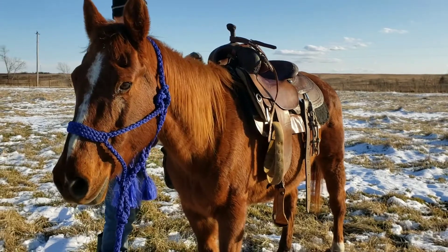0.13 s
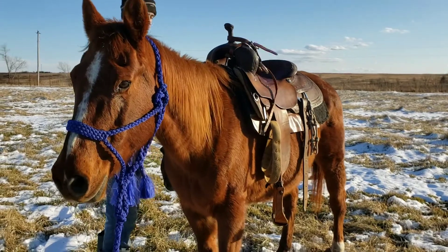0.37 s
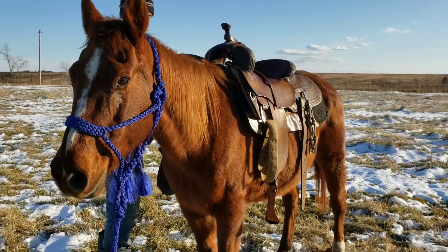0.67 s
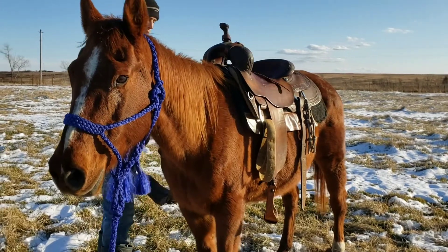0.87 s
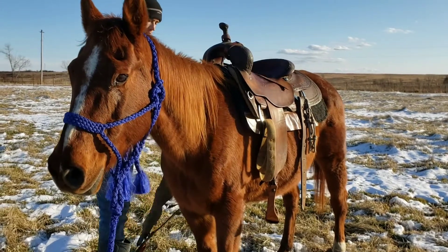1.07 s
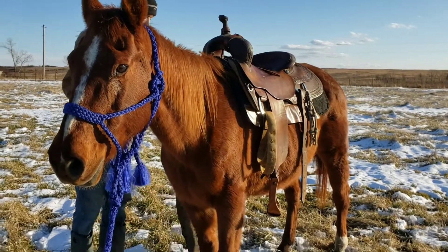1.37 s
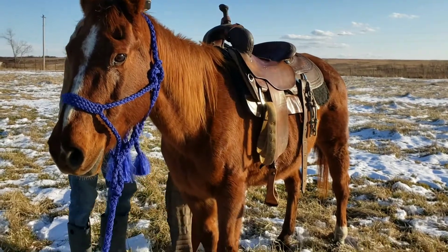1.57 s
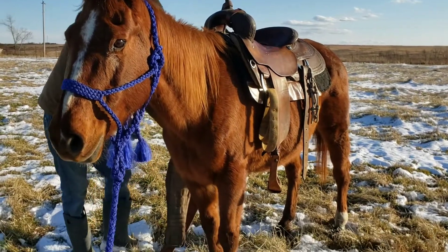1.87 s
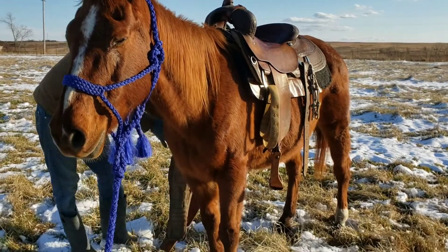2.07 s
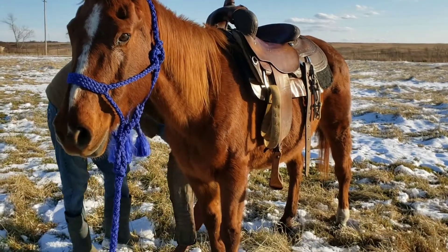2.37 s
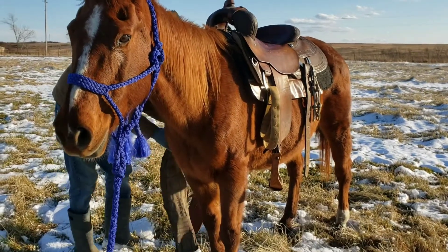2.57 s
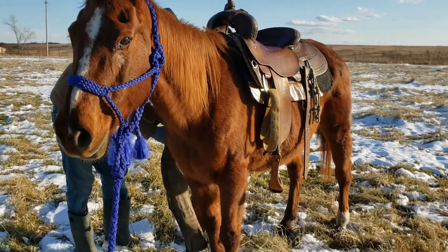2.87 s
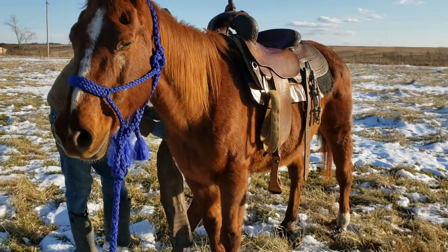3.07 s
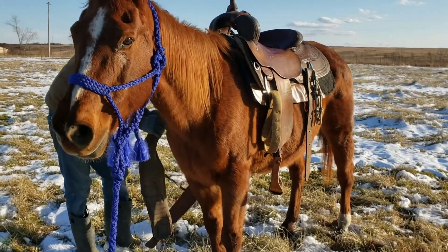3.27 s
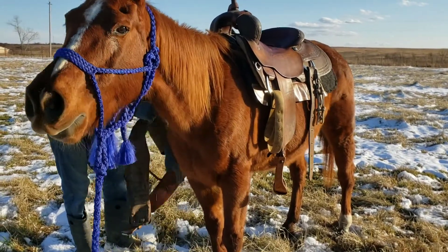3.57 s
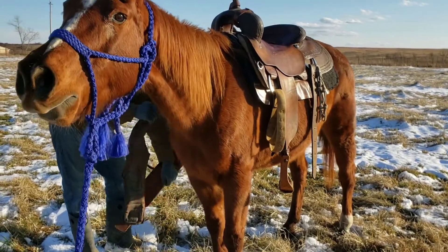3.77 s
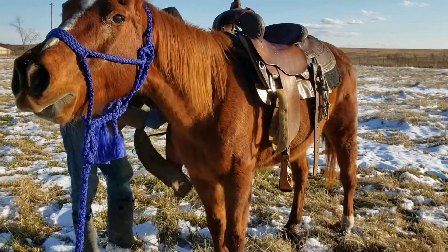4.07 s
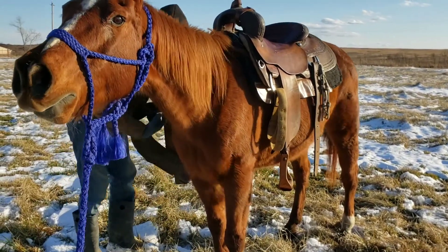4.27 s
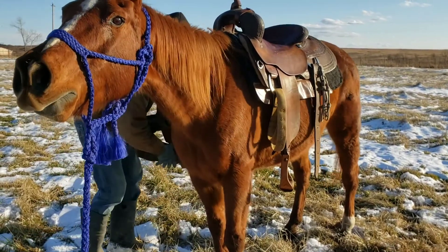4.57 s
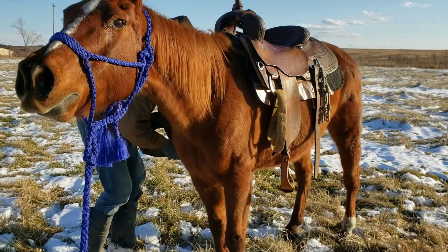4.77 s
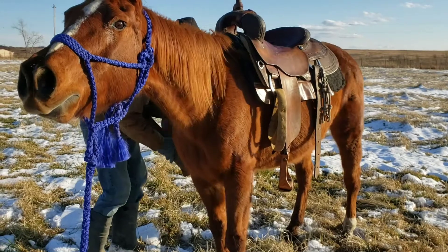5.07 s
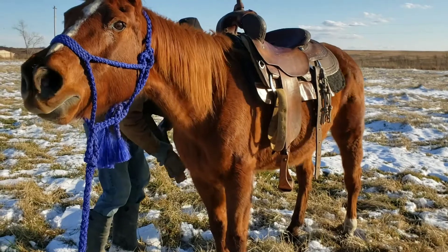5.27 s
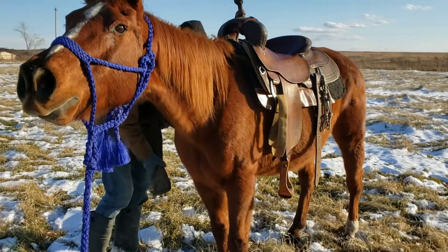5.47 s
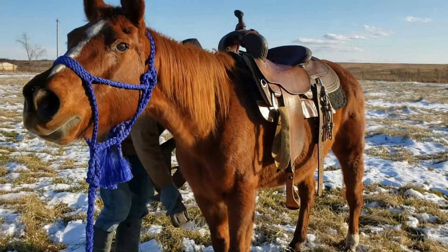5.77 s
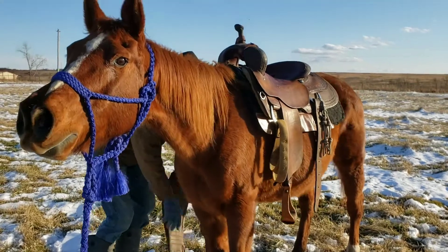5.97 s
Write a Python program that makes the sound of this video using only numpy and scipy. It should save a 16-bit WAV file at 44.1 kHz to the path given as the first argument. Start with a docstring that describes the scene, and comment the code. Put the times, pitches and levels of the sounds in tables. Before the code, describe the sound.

A saddled horse stands close to two spaced microphones in the open. The first half is very quiet: wind rumble, soft clothing scuffs, leather and metal ticks, faint descending bird notes and a barely audible husky tone. Then comes a wet smack and tiny peeps, and the horse nickers loudly, squeal after squeal tumbling into deep throaty pulses, growing lower and rougher before breaking into wet snaps, one last push and feeble throbs.

```python
"""A horse nickers close by in an open field: a run of squeals, each sliding down to a low throb.
Vocal folds are phase oscillators, the larynx whistles as a jet tone, and breath is noise shaped by airway
resonances. Peeps and wet snaps join in; tack ticks as decaying rings, a far bird slurs as gliding sines.
A faint husky tone, wind, rustling cloth and still air are shaped noise; two spaced microphones hear it all.
"""
import sys
import numpy as np
from scipy import signal
from scipy.fft import rfft, irfft, next_fast_len
from scipy.io import wavfile
from scipy.ndimage import uniform_filter1d, map_coordinates

SR = 44100
rng = np.random.default_rng(int(sys.argv[2]) if len(sys.argv) > 2 else 0)


def invert_db(level):
    """Linear amplitude ratio for a level in decibels (20 dB per decade), elementwise."""
    return 10 ** (np.asarray(level, dtype=float) / 20)


def unload_audio(sound):
    """Save the sound as a 16-bit wav file, at the path given as the first command line argument."""
    columns = np.transpose(np.atleast_2d(sound))
    # keep every value between -1 and 1, then stretch to whole-number steps
    steps = np.round(np.clip(columns, -1, 1) * 32767)
    wavfile.write(sys.argv[1], SR, steps.astype(np.int16))


N = 270320  # samples

# Vocal folds sliding in pitch: (start [s], start pitch [Hz], slide [s], landing pitch [Hz],
# share of the logarithmic slide done halfway)
FOLD_SLIDES = [(3.75, 905.3, 0.11, 425, 0.51), (3.89, 963.5, 0.095, 340.3, 0.48),
               (4.04, 1152, 0.14, 276.8, 0.6), (4.2, 1209, 0.12, 317.3, 0.56),
               (4.37, 1147, 0.14, 199.7, 0.43), (4.547, 1170, 0.12, 182.5, 0.46),
               (4.742, 926.3, 0.083, 177.9, 0.4), (4.926, 700, 0.085, 170.8, 0.38),
               (5.111, 582, 0.12, 113.5, 0.53), (5.401, 221.5, 0.0405, 165.3, 0.22),
               (5.47, 149.9, 0.12, 155.6, .5), (5.633, 676.4, 0.062, 183.5, .45),
               (5.932, 230, 0.025, 172.4, 0.49), (6.0, 159.5, 0.13, 144, 0.51)]
SAG_PER_S, RESET_S = 1.9, 0.0072  # log pitch lost a second after landing; time to tighten again [s]
# Low throbs of the slack folds: (time [s], relative peak level [dB], decay width [s])
FOLD_THROBS = [(3.995, -32.5, 0.0063), (4.154, -30.5, 0.0067), (4.331, -27, 0.011), (4.47, -34, 0.014),
               (4.503, -19.5, 0.012), (4.666, -16, 0.0099), (4.704, -20.5, 0.011), (4.83, -16.5, 0.014),
               (4.876, -19, 0.013), (5.003, -17.5, 0.013), (5.058, -20.5, 0.015), (5.18, -20, 0.015),
               (5.217, -21.5, 0.0028), (5.423, -37, 0.015), (5.495, -34, 0.004), (5.512, -20, .008),
               (5.535, -35, 0.0073), (5.569, -31, 0.008), (5.595, -20.5, 0.01), (5.689, -20, 0.013),
               (5.714, -18.5, 0.008), (5.958, -35.5, 0.0087), (6.036, -25.5, 0.0078), (6.096, -30, 0.01),
               (6.125, -22.5, 0.0037)]
SLOW_RISE = 1.4  # rise width over decay width
# Tight folds catching as a high slide starts:
# (attack [dB/s], first relative level [dB], hold [s], last relative level [dB], release [dB/s])
SQUEAK_RULE = (3000, -54, 0, -57.5, 605)
SQUEAL_DB, FLUTTER_DB = -1.5, 3  # tight folds against throat effort; scale of their unsteady level
RIPPLE_DB, HOARSE = 1.8, .15  # scales of the folds' random level and phase [rad]
BEAT = .35  # every third cycle closes harder by this share

# Whistle of the larynx: (start [s], length [s], edge pitch [Hz], top pitch before droop [Hz],
# relative late level [dB])
LARYNX_WHISTLES = [(3.75, .088, 1660, 1850, -25), (3.895, .088, 1680, 1920, -26),
                   (4.065, .078, 1660, 1900, -23), (4.228, .075, 1680, 1880, -24),
                   (4.398, .078, 1700, 1860, -23), (4.575, .058, 1710, 1830, -21),
                   (4.76, .045, 1610, 1640, -27), (4.96, .03, 1670, 1710, -27),
                   (5.135, .03, 1690, 1710, -29)]
GROWTH_DB, DROOP_HZ = 4, 90  # level gained along a whistle; fall in pitch at its very end

# Pushes of breath: (full flow from [s], hold [s], first relative level [dB], last relative level [dB])
BREATH_PUSHES = [(3.789, 0.022, -26.5, -22.5), (3.934, 0.037, -22.5, -21.5), (4.098, 0.044, -23.5, -22),
                 (4.263, 0.038, -23, -22), (4.421, 0.048, -25, -23), (4.596, 0.035, -23.5, -22),
                 (4.777, 0.038, -23.5, -24.5), (4.957, 0.028, -23.5, -24), (5.14, 0.018, -24.5, -23.5),
                 (5.654, 0.024, -24, -23.5)]
# How each breath layer follows a push: (attack [dB/s], first offset [dB], last offset [dB],
# linger [s], change over the linger [dB], release [dB/s]); breath() sets a floor to the linger
THROAT_RULE = (300, -8.5, -7, .018, -2, 750)
RASP_RULE = (440, -3, -0.5, -0.0086, -5.5, 695)
NOSTRIL_RULE = (414, -8, -7, -0.2383, 0.5, 595)
# Short puffs past lips and palate:
# (time [s], relative rasp level [dB], throat over rasp [dB], hiss over rasp [dB])
LIP_PUFFS = [(3.378, -58, 16, 2), (3.425, -45.5, 8, -3), (3.406, -55, 22.5, -4), (3.444, -50.5, 26, 14.5),
             (3.484, -54, 22, 13), (3.539, -40, -17, -4), (4.048, -39, -11, -12), (4.208, -46, -5, -12),
             (4.354, -41, 4.5, 6), (4.556, -43, -8, -23), (4.868, -37.5, 5, 1), (5.037, -28, -4, -10),
             (5.216, -34, -3, -2), (5.419, -38, 1.5, 2), (5.491, -45, -16, 18), (5.545, -24, -33, -22),
             (5.569, -44, -12, 14), (5.945, -41, 4, 0.5), (6.069, -38, -24, 2), (6.124, -30.5, -7, -4)]
PUFF_RISE, PUFF_FALL = 1250, 1020  # dB/s
# Air leaking between pushes: (time [s], relative rasp level [dB])
BREATH_LEAK = [(3.2, -91), (3.34, -59), (3.39, -45), (3.435, -40.5), (3.46, -49.5), (3.52, -53),
               (3.61, -47.5), (3.64, -43.5), (3.665, -41.5), (3.745, -41), (3.87, -38.5), (4.0, -50.5),
               (4.55, -44), (4.72, -46), (5.201, -43.5), (5.245, -97), (5.278, -58.5), (5.334, -43),
               (5.4, -44.5), (5.47, -63), (5.495, -41), (5.529, -35.5), (5.619, -41.5), (5.718, -41),
               (5.758, -62), (5.929, -43), (5.959, -52), (5.986, -79), (6.021, -42.5), (6.12, -44)]
LEAK_THROAT_DB, LEAK_HISS_DB = -4, -1.5  # over the rasp
# Corners of the span in which the throat is shut: (closing [s], shut [s], opening [s], open [s])
THROAT_SHUT = (3.55, 3.57, 3.635, 3.65)
SHUT_DB = -17  # throat layer while shut
# Airway resonances: (centre [Hz], width [Hz], relative level [dB])
AIRWAY_MODES = [(180, 90, -7), (600, 110, -6), (1150, 260, -3), (1700, 190, -1.5), (2120, 100, 1),
                (2400, 150, 1), (3050, 150, -14), (3620, 130, -9)]
# Notches cut by side pockets of the airway: (centre [Hz], width [Hz])
SIDE_POCKETS = [(1410, 150), (1965, 110), (2770, 520)]
# Spectrum of the nostril hiss: (frequency [Hz], relative density [dB per Hz])
HISS_SPECTRUM = [(1760, -97), (3000, 4), (3240, -5.5), (3600, 7.5), (4000, 6), (4300, 5.5), (4830, -5),
                 (5700, 6.5), (6150, 4.5), (7050, 0.5), (7700, -10), (8500, -48), (9500, -11), (12500, -2),
                 (16000, -1.5)]
VOICING = 1.7  # overtones of the folds against breath noise in the throat
CLAP, BURST_DB = 1.3, 1.6  # claps of the folds against noise in the rasp; scale of the rasp's bursts

# Thin peeps before the run, one table a peep: (time [s], pitch [Hz], relative level [dB])
FOLD_PEEPS = [
    [(3.533, 1054, -48), (3.556, 1155, -41)],
    [(3.562, 1530, -36), (3.578, 1610, -36), (3.588, 1790, -39), (3.6, 1540, -37)],
    [(3.665, 1167, -36), (3.69, 1015, -36), (3.72, 1070, -40.5), (3.75, 1192, -35)],
]
# Octave over each peep's fundamental, in order: (level [dB])
PEEP_OCTAVES = [-1, -34, -4.5]
# Wet snaps of lips and palate: (time [s], relative level [dB], low push over that level [dB])
WET_SNAPS = [(3.405, -47, -8), (3.425, -42, 0), (3.444, -27, 10), (3.484, -45, -11), (5.414, -20, -9),
             (5.486, -29, 0), (5.542, -21.5, 5.5), (5.563, -17, 5), (5.578, -9.5, -12), (5.941, -27.5, 3),
             (6.066, -21.5, 6)]

# Left microphone over right, for the horse: (frequency [Hz], level difference [dB])
LEFT_OVER_RIGHT = [(60, 2), (380, .5), (1000, 3), (1700, 5), (2100, -3.5), (4400, .4), (8100, 1),
                   (15000, 5)]
# Lead of the left microphone, as long waves bend round and arrive nearly together:
# (frequency [Hz], lead [ms])
LEFT_LEAD = [(100, .02), (500, .19), (1400, .357), (4100, .366), (6000, .413), (11000, .405)]

# Buckles and leather:
# (time [s], relative level [dB], relative thud level [dB], 60 dB decay time [s], ring [Hz])
TACK_TICKS = [(0.5682, -53.5, 2.5, 0.013, 6500), (0.581, -46, -5.5, 0.029, 5630),
              (0.648, -62, -2.5, 0.024, 5800), (0.9045, -48.5, -45, 0.48, 14300),
              (1.346, -17, -39.5, 0.012, 16200), (2.707, -54.5, -10, 0.04, 6600),
              (2.806, -46.5, -43, 0.11, 5700), (2.931, -43.5, -44, 0.031, 6700),
              (3.031, -47, -40, 0.034, 6800), (3.0869, -35.5, -22.5, 0.1, 6300),
              (3.176, -34.5, -38, 0.058, 15000), (3.2072, -42.5, -36, 0.17, 4580),
              (3.2278, -31, -31.5, 0.035, 6640)]
# Far bird, one table a note: (time [s], pitch [Hz], relative level [dB])
BIRD_NOTES = [
    [(.9, 2810, -74), (.97, 2770, -72), (1.0, 2860, -78)],
    [(.9, 5850, -76), (.925, 5800, -76)],
    [(1.22, 4760, -69), (1.35, 4400, -62), (1.42, 4130, -74), (1.54, 3700, -76)],
    [(1.395, 5550, -72), (1.415, 5500, -72)],
    [(1.675, 4980, -75), (1.71, 4880, -74)],
    [(1.81, 4640, -81), (1.84, 4570, -76)],
    [(1.92, 3620, -76), (2.05, 2950, -64), (2.12, 2870, -73), (2.25, 2890, -82)],
    [(2.04, 1750, -86), (2.2, 2150, -78), (2.3, 2450, -80)],
    [(3.195, 4390, -62), (3.225, 4360, -62)],
]

# Faint husky tone: (time [s], level [dB]), then its spectrum (frequency [Hz], relative density [dB per Hz])
DRONE_SWELL = [(1.6, -100), (1.75, -71.5), (2.6, -69), (2.75, -100)]
DRONE_SPECTRUM = [(900, -30), (1220, 0), (1500, -30)]

# Movement of cloth and straps: (time [s], rustle level [dB])
CLOTH_MOVES = [(0, -82.5), (.6, -61.5), (.88, -67.5), (.97, -63), (1.22, -52), (1.33, -54.5), (1.4, -58),
               (2.25, -65), (2.8, -63), (3.3, -64)]
# Scuffs of cloth and straps: (time [s], level [dB])
CLOTH_SCUFFS = [(1.02, -52), (1.078, -49.5), (1.19, -47), (1.28, -46.5), (1.335, -50), (1.66, -57),
                (1.901, -54), (2.18, -59.5)]
# Low buffets of wind: (start [s], hold [s], relative level [dB])
WIND_BUFFETS = [(0.563, 0.0091, -58.5), (1.108, 0.09, -69), (2.426, 0.045, -48.5), (2.597, 0.25, -54),
                (3.27, 4.7, -65)]
# Blasts of air at the microphones: (start [s], hold [s], relative level [dB])
AIR_BLASTS = [(3.45, 0.0034, -38.5), (3.912, 0.0098, -36), (4.67, 0.19, -50), (4.99, 0.21, -47.5),
              (5.527, 0.0092, -41), (6.094, 0.041, -49)]
SCUFF_SLOPE, BUFFET_SLOPE, BLAST_RISE, BLAST_FALL = 210, 80, 310, 195  # dB/s
# Level of the still air: (time [s], level [dB])
STILL_AIR_LEVEL = [(0, -69), (.75, -69.5), (1.2, -75), (3.3, -62)]
# Spectra of wind hum, buffets, blasts, rustle and still air:
# (frequency [Hz], relative density [dB per Hz])
HUM_SPECTRUM = [(15, -48), (25, -19), (39, -16.5), (81, 0), (113, -11.5), (204, -22.5), (400, -30.5),
                (520, -52), (880, -120)]
BUFFET_SPECTRUM = [(47, -8.5), (80, 1), (204, -2), (400, -29), (520, -67), (880, -120)]
BLAST_SPECTRUM = [(12, -55), (28, -10), (50, 9.5), (100, -16.0), (200, -27.0)]
RUSTLE_SPECTRUM = [(180, 4.5), (300, 0), (645, -8.5), (787, -1), (1580, -7.5), (4590, -6), (5250, -6),
                   (6620, 2.5), (8090, -20), (14700, 2.5), (16000, -5.5)]
STILL_AIR_SPECTRUM = [(120, -54), (200, -61), (432, -7.5), (600, -5), (722, -7), (1650, -8), (2250, -3),
                      (2600, 1), (2900, -4.5), (4120, -12.5), (4350, -13), (6640, -8.5), (9230, -64),
                      (16000, -35)]


def along(points, hz):
    """Interpolation of (frequency [Hz], value) points on a logarithmic frequency axis."""
    f, v = np.transpose(points)
    return np.interp(np.log(hz + 1), np.log(f + 1), v)


def curves(rows):
    """Linear interpolation in time: one value per sample for each column after the time."""
    s, *cols = np.transpose(rows)
    return [np.interp(np.arange(N) / SR, s, c) for c in cols]


def unit(x):
    """Normalization to a root-mean-square value of 1."""
    return x / np.sqrt(np.mean(x ** 2) + 1e-20)


def wobble(rate):
    """Band-limited random modulation: a smooth curve through rate random knots a second."""
    knots = rng.standard_normal(int(N * rate / SR) + 4)
    return map_coordinates(knots, [np.arange(N) * rate / SR])


def filtered(x, response):
    """Linear filtering: the spectrum times a complex response of frequency."""
    m = next_fast_len(N + 8192)
    return irfft(rfft(x, m) * response(np.fft.rfftfreq(m, 1 / SR)), m)[..., :N]


def diffuse(spectrum, mono_hz):
    """Diffuse-field coherence: stereo noise of rms 1, alike on both sides well below mono_hz."""
    def mid_side(hz):
        turn = np.arccos(1 / (1 + (hz / mono_hz) ** 2)) / 2
        return invert_db(along(spectrum, hz)) * [np.cos(turn), np.sin(turn)]

    mid, side = filtered(rng.standard_normal((2, N)), mid_side)
    return unit(np.array([mid + side, mid - side]))


def ramped(corners, rise, fall):
    """Exponential onset and decay: corners led in and out by slopes in dB/s."""
    (s0, db0), (s1, db1) = corners[0], corners[-1]
    return [(s0 - 100 / rise, db0 - 100)] + corners + [(s1 + 100 / fall, db1 - 100)]


def swells(shapes):
    """Power addition: gain of overlapping swells, each given by corners (time [s], level [dB])."""
    t = np.arange(0, N / SR + .002, .001)
    power = sum(invert_db(2 * np.interp(t, *np.transpose(corners))) for corners in shapes)
    return np.interp(np.arange(N) / SR, t, np.sqrt(power))


def horse():
    """Superposition and interaural cues: folds, whistle and breath reach the left microphone first."""
    effort, throat_gain = breath(THROAT_RULE, LEAK_THROAT_DB, order=1)
    rasp_gain = breath(RASP_RULE, 0, order=0)[1]
    hiss_gain = breath(NOSTRIL_RULE, LEAK_HISS_DB, order=2)[1]
    phase, size = folds(effort)
    shake = invert_db(0.95 * wobble(98))
    gate = (1 + 0.027 * np.cos(phase)) * shake  # the folds chop the air once a cycle
    air = rng.standard_normal((4, N))
    throat = throat_breath(gate * air[:2], phase, size, effort, shake) * throat_gain
    throat = throat * invert_db(np.interp(np.arange(N) / SR, THROAT_SHUT, (0, SHUT_DB, SHUT_DB, 0)))
    rasp = raspy_breath(gate * air[1:3], air[3], phase, effort) * rasp_gain
    hiss = nostril_hiss(gate * air[2:]) * hiss_gain

    voice = size * np.sin(phase) + invert_db(2) * filtered(whistle(phase, size), side_pockets)
    direct = voice + throat[0] + rasp[0] + hiss[0] + snaps() + peeps()
    side = np.array([[.5], [-.5]])  # left, right

    def to_microphones(f):
        lead_s = along(LEFT_LEAD, f) / 1000
        return invert_db(side * along(LEFT_OVER_RIGHT, f)) * np.exp(2j * np.pi * f * side * lead_s)

    # bounces off head and ground differ side to side
    bounces = .75 * hiss[1] + .3 * rasp[1] + .45 * throat[1]
    return filtered(direct, to_microphones) + 2 * side * bounces


def folds(effort):
    """Self-sustained oscillation: phase and envelope of folds that squeal, slide, land, sag and throb."""
    t = np.arange(N) / SR
    ends = [row[0] - RESET_S for row in FOLD_SLIDES[1:]] + [N / SR]
    corners = []  # (time [s], natural log of pitch in Hz)
    for (s, hz, slide, low, half), end in zip(FOLD_SLIDES, ends):
        landing = s + slide
        corners += [(s, np.log(hz)),
                    (s + slide / 2, np.log(hz) + half * np.log(low / hz)),
                    (landing, np.log(low)),
                    (max(end, landing + .001), np.log(low) - SAG_PER_S * max(end - s - slide, 0))]
    jitter = 1 + 0.02 * wobble(60) + 0.025 * wobble(250)
    phase = 2 * np.pi * np.cumsum(np.exp(curves(corners)[0]) * jitter) / SR

    attack, first_db, hold, last_db, release = SQUEAK_RULE
    squeaks = swells([ramped([(s, first_db), (s + hold, last_db)], attack, release)
                      for s, hz, *rest in FOLD_SLIDES if hz > 500])
    power = (np.hypot(effort, squeaks) * invert_db(SQUEAL_DB + FLUTTER_DB * wobble(65))) ** 2
    for s, db, width in FOLD_THROBS:
        near = slice(round((s - .08) * SR), round((s + .08) * SR))
        spread = width * np.where(t[near] < s, SLOW_RISE, 1)
        power[near] += invert_db(2 * db) * np.exp(-((t[near] - s) / spread) ** 2)
    beat = 1 + BEAT * np.cos(phase / 3 + wobble(25))
    return phase + HOARSE * wobble(110), np.sqrt(power) * beat * invert_db(RIPPLE_DB * wobble(70))


def whistle(phase, size):
    """Jet tone and intermodulation: an arched tone, its octave and a rough side tone at jet plus fold pitch."""
    out, waver, rough = np.zeros(N), .5 * wobble(130), .6 * wobble(220)
    voiced = size / (size + invert_db(-31.5))
    for s, length, edge_hz, top_hz, late_db in LARYNX_WHISTLES:
        early_db = late_db - GROWTH_DB
        u = np.arange(round(length * SR)) / (length * SR)  # 0 to 1 along the whistle
        a = round(s * SR)
        here = slice(a, a + len(u))
        arch = np.sin(np.pi * u)
        hz = edge_hz + (top_hz - edge_hz) * arch ** 0.73 - DROOP_HZ * u ** 4
        turn = 2 * np.pi * np.cumsum(hz) / SR + waver[here]
        octave = invert_db(early_db / 2 + 10.5) * arch * np.sin(2 * (turn + rough[here]))
        side_gain = invert_db(12.0) * voiced[here] * np.clip(1.8 * u, 0, 1) * (1 - u ** 4)
        side_tone = side_gain * np.sin(turn + (phase + rough)[here])
        level = invert_db(early_db + (late_db - early_db) * u + 1.5) * arch ** .5
        out[here] += level * (np.sin(turn) + octave + side_tone)
    return out * invert_db(1.5 * wobble(90))


def breath(rule, leak_db, order):
    """Flow-driven turbulence: gain of one layer for the pushes alone, and with puffs and leak added."""
    attack, first_db, last_db, linger, loss_db, release = rule
    pushes = []
    for s, hold, a, b in BREATH_PUSHES:
        corners = [(s, a + first_db),
                   (s + max(hold, .004), b + last_db),
                   (s + hold + max(linger, .012), b + last_db + loss_db)]
        pushes.append(ramped(corners, attack, release))
    puffs = [ramped([(s, db + (0, *colour)[order])], PUFF_RISE, PUFF_FALL) for s, db, *colour in LIP_PUFFS]
    leak = [(s, db + leak_db) for s, db in BREATH_LEAK]
    return swells(pushes), swells(pushes + puffs + [leak])


def throat_breath(noise, phase, size, effort, shake):
    """Source-filter principle: breath noise and fold overtones excite the three lowest airway modes."""
    slack = .13 * wobble(130)  # uneven closing blurs the higher overtones most
    overtones = shake * sum(np.sin(k * (phase + slack)) * invert_db(-1.5 * k) for k in range(2, 12))
    voicing = unit(overtones) * np.clip(effort / invert_db(-24), .15, 1) * size / (size + invert_db(-28))
    source = noise + [[VOICING], [0]] * voicing
    return unit(filtered(source, lambda f: airway(f, AIRWAY_MODES[:3]) * side_pockets(f)))


def raspy_breath(noise, unevenness, phase, effort):
    """Pulse excitation: sharp, uneven claps of the folds and noise drive the higher airway modes."""
    closing = unit(np.exp(9 * np.cos(phase)) * invert_db(2 * unevenness))
    source = noise + [[CLAP], [0]] * (closing * np.clip(effort / invert_db(-36), 0, 1))
    rasp = unit(filtered(source, lambda f: airway(f, AIRWAY_MODES[3:]) * side_pockets(f)))
    return rasp * invert_db(-2.0 + BURST_DB * wobble(120))


def nostril_hiss(noise):
    """Turbulence noise: broadband hiss shaped by its spectrum and the notches of the side pockets."""
    hiss = unit(filtered(noise, lambda f: invert_db(along(HISS_SPECTRUM, f)) * side_pockets(f)))
    return hiss * invert_db(1.86 * wobble(70))


def airway(f, modes=AIRWAY_MODES):
    """Modal superposition: resonances of the throat and nose, summed with alternating sign."""
    return sum((-1) ** k * invert_db(db) * 1j * f * w / (c * c - f * f + 1j * f * w)
               for k, (c, w, db) in enumerate(modes))


def side_pockets(f):
    """Side-branch absorption: each pocket of the airway cuts a notch at its own resonance."""
    return np.prod([1 - .97j * f * w / (c * c - f * f + 1j * f * w) for c, w in SIDE_POCKETS], axis=0)


def peeps():
    """Oscillation near threshold: the tight folds barely sound in thin wavering tones with an octave."""
    out = np.zeros(N)
    for note, octave_db in zip(FOLD_PEEPS, PEEP_OCTAVES):
        start = (note[0][0] - .008, note[0][1], -90)
        end = (note[-1][0] + 0.019, note[-1][1], -90)
        hz, db = curves([start] + note + [end])
        on = db > -89
        turn = 2 * np.pi * np.cumsum(hz * on) / SR + .7 * wobble(140)
        out += on * invert_db(db + 3 * wobble(80)) * (np.sin(turn) + invert_db(octave_db) * np.sin(2 * turn))
    return out


def snaps():
    """Impulsive excitation: short noise bursts ring the airway, each with a low push of air."""
    sharp, soft, t = np.zeros(N + SR), np.zeros(N + SR), np.arange(SR // 20) / SR
    for s, db, push_db in WET_SNAPS:
        burst = invert_db(db + 6.5 - 60 * t / 0.042) * rng.standard_normal(len(t))
        push = invert_db(db + push_db - 60 * t / 0.025) * np.sin(2 * np.pi * 170 * t)
        sharp[round(s * SR):][:len(t)] += burst
        soft[round(s * SR):][:len(t)] += push
    return filtered(sharp[:N], lambda f: airway(f) + 0.046) + soft[:N]


def tack():
    """Damped free vibration: each tick rings at its own pitch in a wide crack, over a dull leather thud."""
    bright, dull = np.zeros((2, N)), np.zeros(N)
    t = np.arange(SR // 10) / SR  # rings are cut off after 0.1 s
    for s, db, thud_db, t60, hz in TACK_TICKS:
        crack, blur = rng.standard_normal((2, 2, len(t)))
        ring = unit(uniform_filter1d(blur, size=24)) * np.sin(2 * np.pi * hz * t) + 0.5 * crack
        bright[:, round(s * SR):][:, :len(t)] += invert_db(db - 3.0 - 60 * t / np.clip(t60, .005, 1)) * ring
        thud = invert_db(db + thud_db + 22.5 - 60 * t / 0.046) * rng.standard_normal(len(t))
        dull[round(s * SR):][:len(t)] += thud
    leather = lambda f: 1j * f * 500 / (620 ** 2 - f * f + 1j * f * 500)
    return filtered(bright, lambda f: f * f / (f * f + 3000 ** 2)) + filtered(dull, leather)


def bird():
    """Frequency modulation: thin slurred sine notes, louder on the left."""
    out = np.zeros(N)
    for note in BIRD_NOTES:
        start = (note[0][0] - .01, note[0][1], -120)
        end = (note[-1][0] + 0.016, note[-1][1], -120)
        hz, db = curves([start] + note + [end])
        turn = 2 * np.pi * np.cumsum(hz) / SR + .35 * wobble(60)
        out += invert_db(db + 5 + 2 * wobble(30)) * np.sin(turn)
    return out * invert_db([[1.5], [-1.5]])


def drone():
    """Narrow-band noise: a faint husky tone hangs in the distance for about a second."""
    return invert_db(curves(DRONE_SWELL)[0]) * diffuse(DRONE_SPECTRUM, mono_hz=900)


def field():
    """Spaced-pair reception: wind, rustle and still air, reaching the right microphone later."""
    left, right = wind() * invert_db([[.9], [-.9]]) + rustle() + still_air()
    return np.array([left, np.roll(right, shift=5)])  # 5 samples later


def wind():
    """Low-frequency turbulence: a steady hum, low buffets, and blasts of air at the microphones."""
    buffets = swells([ramped([(s, db), (s + hold, db)], BUFFET_SLOPE, BUFFET_SLOPE)
                      for s, hold, db in WIND_BUFFETS])
    blasts = swells([ramped([(s, db), (s + hold, db)], BLAST_RISE, BLAST_FALL)
                     for s, hold, db in AIR_BLASTS])
    hum = invert_db(-58.5 + 2.1 * wobble(19.0)) * diffuse(HUM_SPECTRUM, mono_hz=416)
    buffeting = buffets * invert_db(3.4 * wobble(28.22)) * diffuse(BUFFET_SPECTRUM, mono_hz=425)
    gusts = blasts * invert_db(4.3 * wobble(25.1)) * diffuse(BLAST_SPECTRUM, mono_hz=123)
    return hum + buffeting + gusts


def rustle():
    """Friction noise: grainy noise of cloth and straps under the swells of movement and scuffs."""
    grains = invert_db(1.3 * wobble(22) + 3 * np.array([wobble(150), wobble(150)]))
    scuffs = [ramped([scuff], SCUFF_SLOPE, SCUFF_SLOPE) for scuff in CLOTH_SCUFFS]
    return swells([CLOTH_MOVES] + scuffs) * unit(grains * diffuse(RUSTLE_SPECTRUM, mono_hz=700))


def still_air():
    """Ambient diffuse field: faint shaped noise whose level drifts slowly."""
    level = invert_db(curves(STILL_AIR_LEVEL)[0] + 0.54 * wobble(5.55))
    return level * diffuse(STILL_AIR_SPECTRUM, mono_hz=600)


def scene():
    """Linear superposition of all sources in the open field."""
    return horse() + tack() + bird() + drone() + field()


def roll_off(x):
    """The treble ends steeply here."""
    return signal.sosfilt(signal.butter(12, 16790, fs=SR, output="sos"), x)


def record(dry):
    """Band limitation: frequencies from 15850 Hz upward are lowered by 40 dB."""
    mix = filtered(dry, lambda f: np.where(f < 15850, 1, invert_db(-40)))
    return roll_off(mix)


dry = scene()
out = record(dry)
unload_audio(out)
```